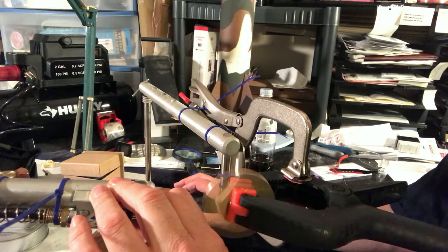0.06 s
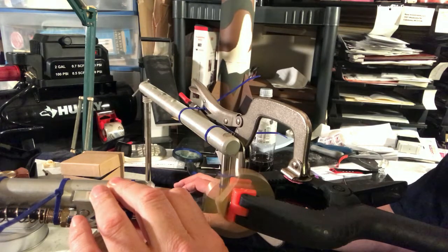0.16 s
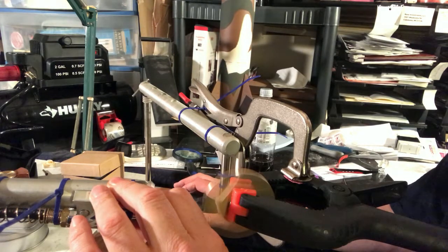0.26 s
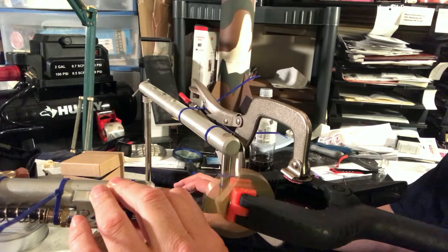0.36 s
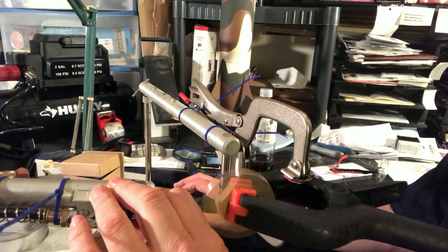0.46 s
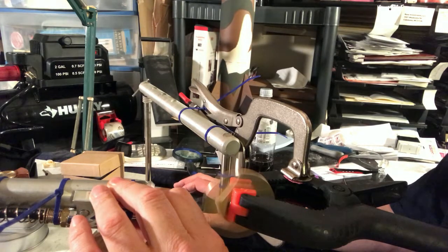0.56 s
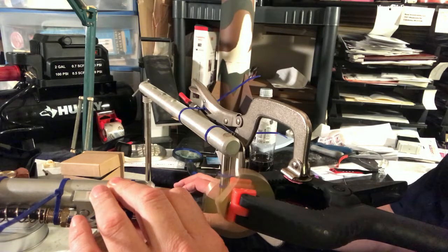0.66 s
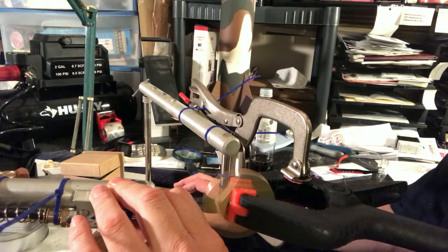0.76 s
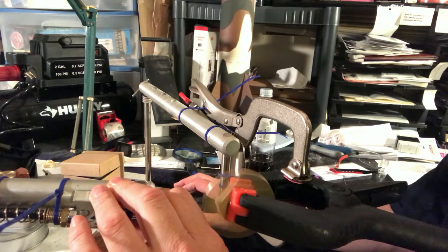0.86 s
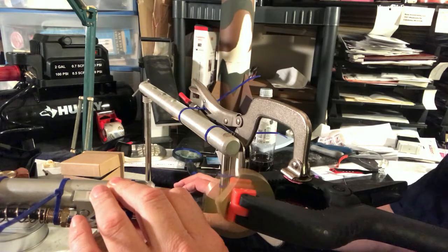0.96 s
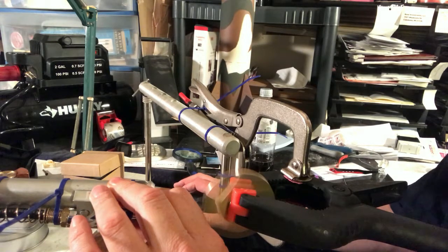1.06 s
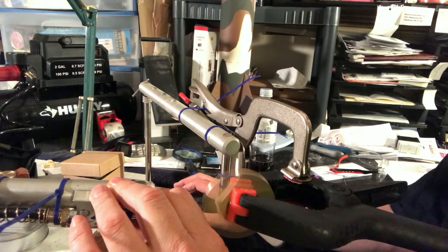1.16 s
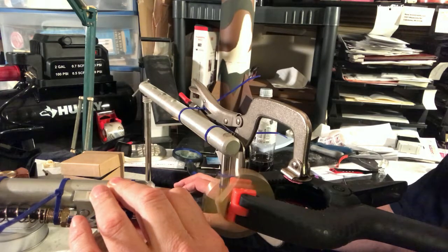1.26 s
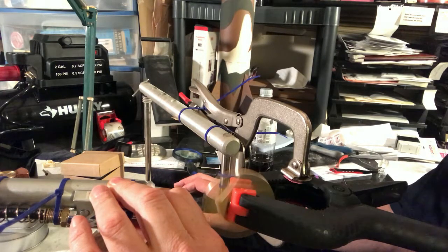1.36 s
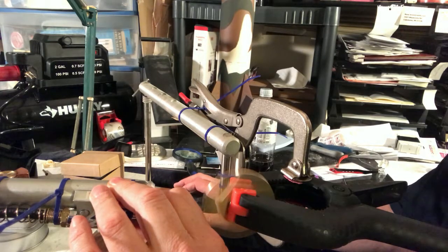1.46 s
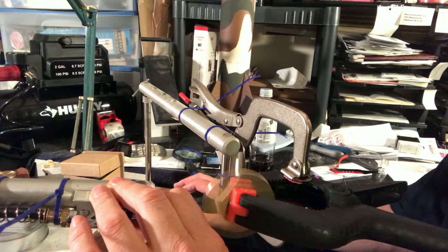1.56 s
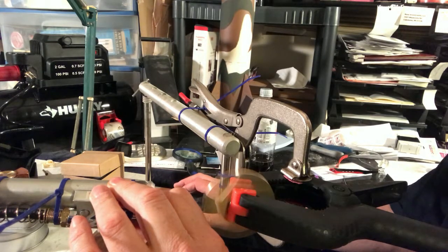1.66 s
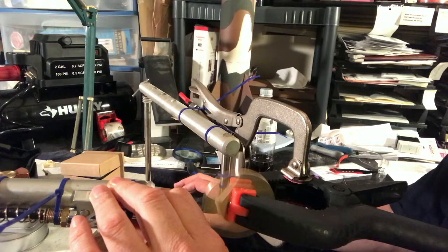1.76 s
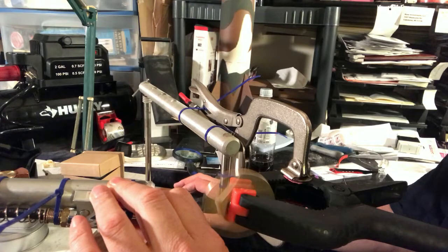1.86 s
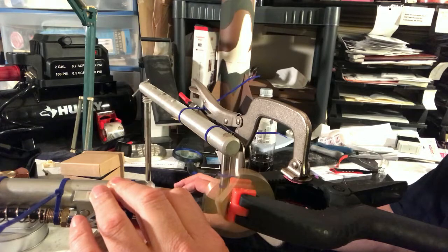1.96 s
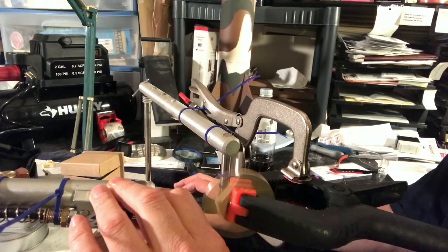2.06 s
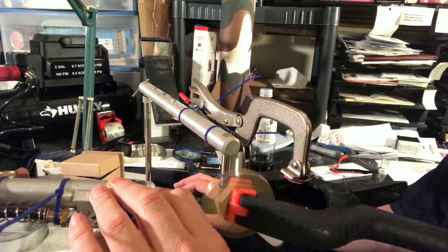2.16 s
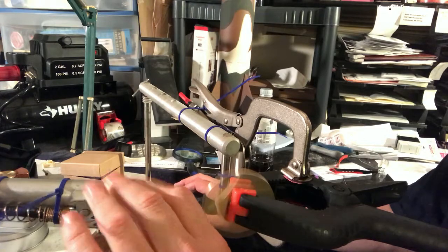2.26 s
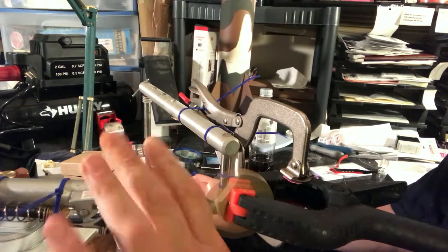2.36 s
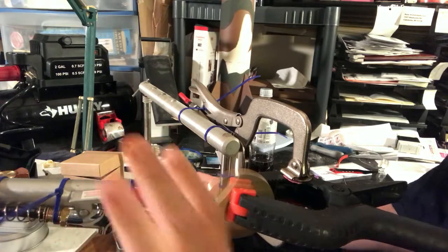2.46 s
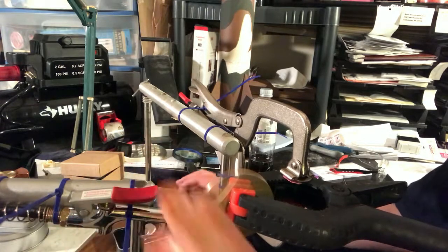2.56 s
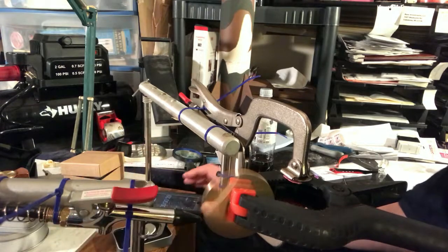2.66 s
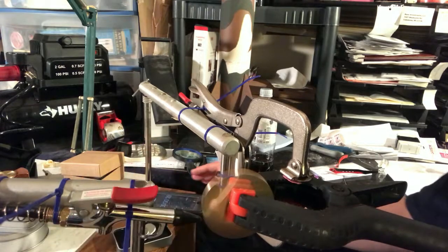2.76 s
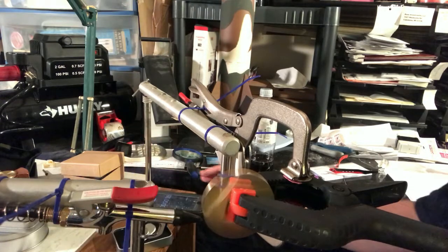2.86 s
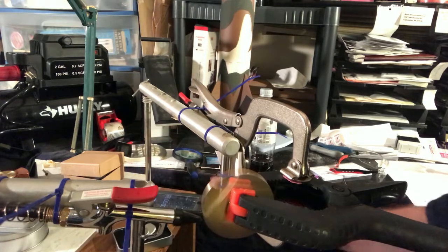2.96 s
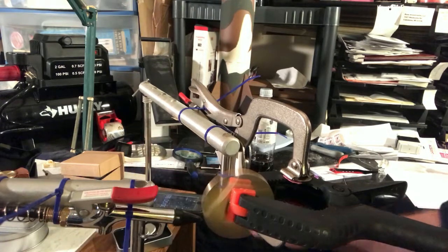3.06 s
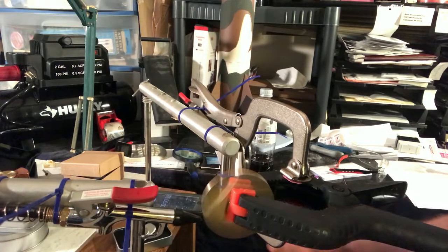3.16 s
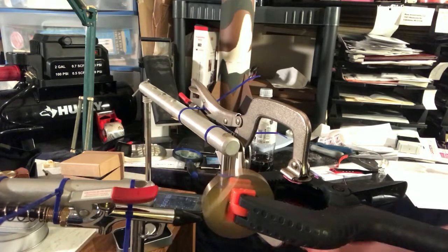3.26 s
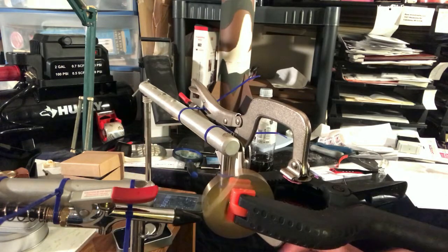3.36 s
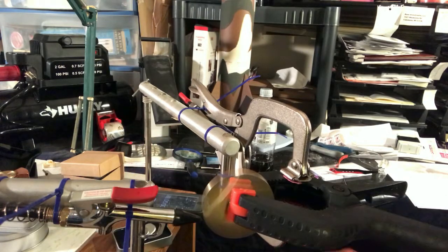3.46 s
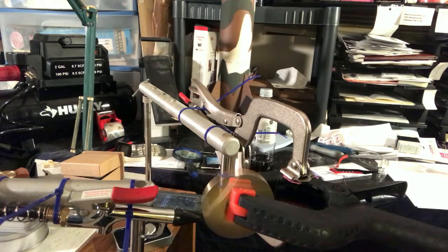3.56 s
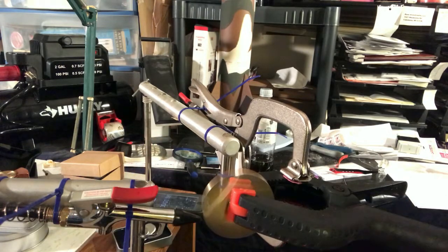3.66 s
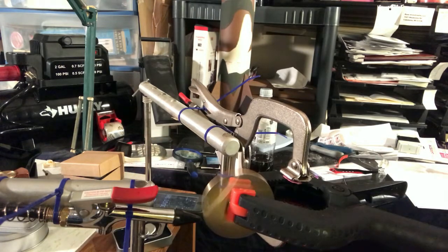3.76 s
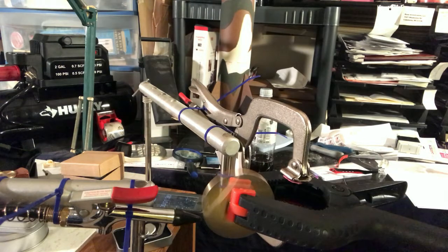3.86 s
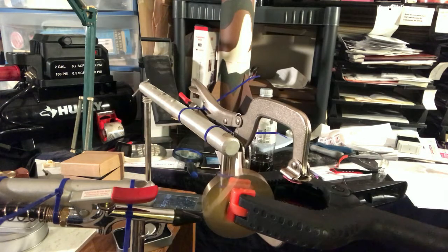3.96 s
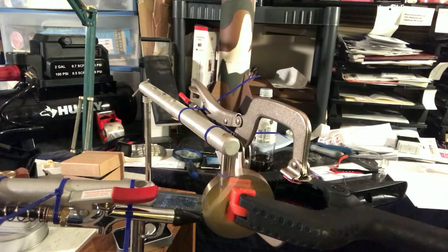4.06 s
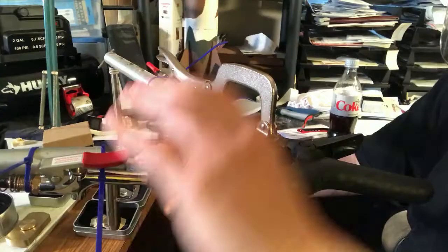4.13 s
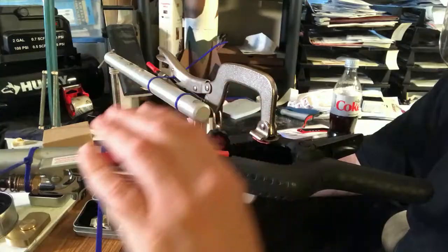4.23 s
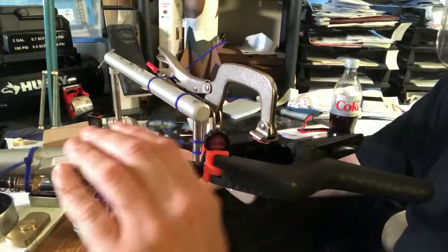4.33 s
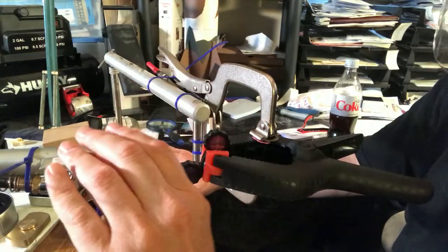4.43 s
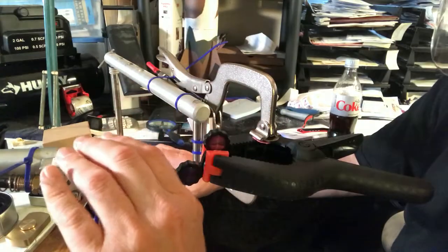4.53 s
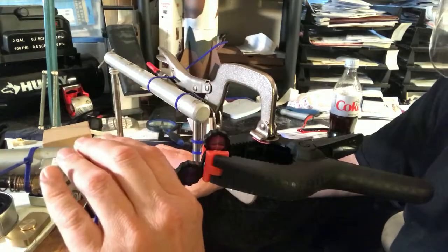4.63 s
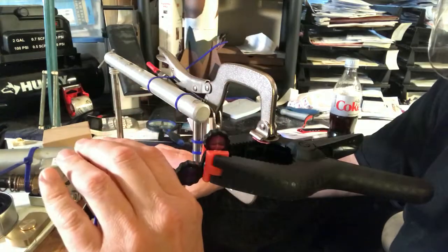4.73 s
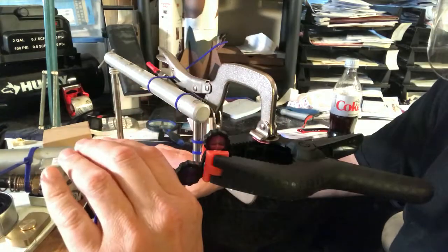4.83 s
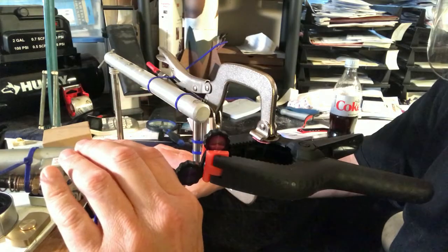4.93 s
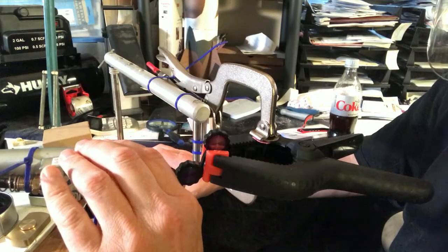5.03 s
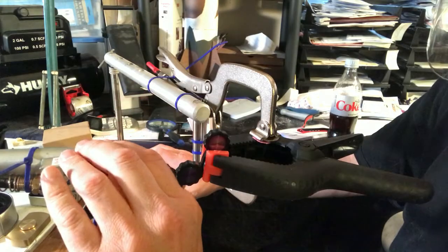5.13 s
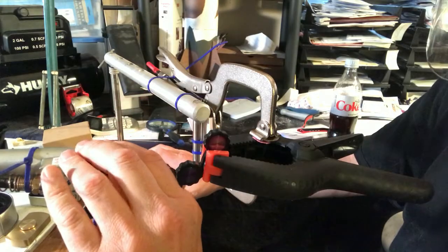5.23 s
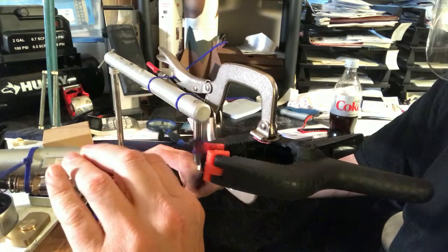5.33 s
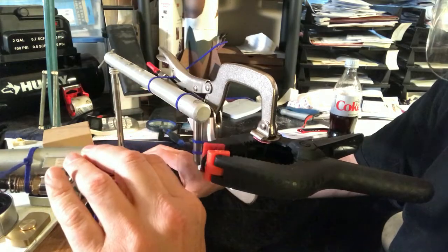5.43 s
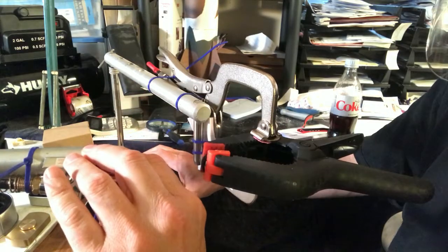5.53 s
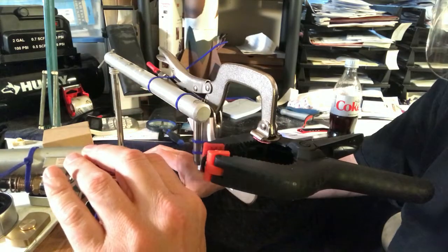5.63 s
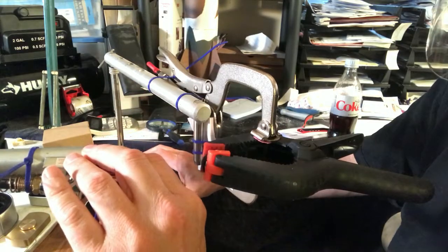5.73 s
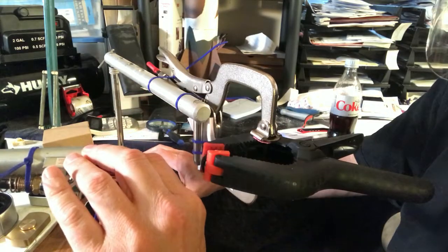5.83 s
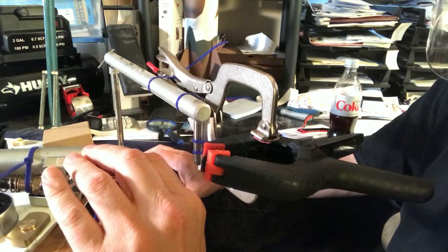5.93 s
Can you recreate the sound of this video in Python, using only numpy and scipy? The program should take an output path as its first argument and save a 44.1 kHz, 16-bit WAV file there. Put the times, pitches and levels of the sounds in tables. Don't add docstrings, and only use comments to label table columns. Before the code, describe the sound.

Close, fairly dry, nearly mono sound: steady bright air hiss with a loud rising siren, shut off suddenly. A metallic rattling whir remains, with high thin squeals and irregular hard clicks over a growing low hum. A cut to silence, then faint room hum, then a burst of air on a smaller spinner, chopped slowly at first, then quickly accelerating into a whine, with low wind thumps.

```python
import sys
import numpy as np
from scipy import signal
from scipy.fft import rfft, irfft
from scipy.io import wavfile

SR = 44100
rng = np.random.default_rng(int(sys.argv[2]) if len(sys.argv) > 2 else 0)


def field_ratio(decibels):
    return 10 ** (np.asarray(decibels, dtype=float) / 20)


def wrap_up_sound(samples):
    columns = np.atleast_2d(samples).T
    tamed = np.clip(columns, -1, 1)
    steps = np.round(tamed * 32767).astype(np.int16)
    wavfile.write(sys.argv[1], SR, steps)


N = 264140
T = np.arange(N) / SR


def rms_one(x):
    return x / np.sqrt(np.mean(x ** 2) + 1e-20)


def in_time(rows, **ends):
    t, *columns = np.transpose(rows)
    return [np.interp(T, t, c, **ends) for c in columns]


def drift(rate_hz):
    r = np.exp(-80 * np.pi * rate_hz / SR)
    white = rng.standard_normal(N // 40 + 2002)
    slow = signal.lfilter([1], [1, -2 * r, r * r], white)[2000:]
    return np.interp(np.arange(N) / 40, np.arange(len(slow)), rms_one(slow - slow.mean()))


def coloured(spectrum):
    hz, level_db = np.transpose(spectrum)
    bins_hz = np.maximum(np.arange(N // 2 + 1) * SR / N, 1)
    gain = field_ratio(np.interp(np.log(bins_hz), np.log(hz), level_db))
    return rms_one(irfft(rfft(rng.standard_normal(N)) * gain, N))


def resonances(x, modes):
    out = 0
    for k, (hz, width_hz, level_db) in enumerate(modes):
        r = np.exp(-np.pi * width_hz / SR)
        poles = [1, -2 * r * np.cos(2 * np.pi * hz / SR), r * r]
        gain = (-1) ** k * field_ratio(level_db) * (1 - r * r) / 2
        out = out + gain * signal.lfilter([1, 0, -1], poles, x)
    return out


def bell_db(hz, centre_hz, width_hz, peak_db):
    return peak_db / (1 + (2 * (hz - centre_hz) / width_hz) ** 2)


def high_pass(x, order, hz):
    return signal.sosfilt(signal.butter(order, hz, "high", fs=SR, output="sos"), x)


ROOM_T60_S, ROOM_DB = 0.16, -10.5


def room(x):
    age = np.arange(SR // 2) / SR
    tail = rng.standard_normal(SR // 2) * field_ratio(-60 * age / ROOM_T60_S) * (age > .004)
    return x + field_ratio(ROOM_DB) * signal.fftconvolve(x, tail / np.sqrt(np.sum(tail ** 2)))[:N]


# f/Hz, density/dB
SHOP_SPECTRUM = [(24, -36.5), (40, -7.5), (101, 0), (185, -3.5), (345, -5.5), (491, -16.5), (615, -13.5),
                 (1550, -17), (1760, -16), (2150, -23), (6490, -28.5), (14500, -38), (16000, -41.5)]
# f/Hz, level/dB
HUM_LINES = [(119.6, -80.5), (179.7, -72), (239.2, -75), (359.7, -80.5), (893.8, -85), (1120, -88)]
# t/s, length/s, level/dB
FAN_SWELLS = [
    (4.33, .58, -73),
    (5.08, .6, -74.5),
]
SHOP_DB, WHINE_HZ = -62.5, 1739.6


def shop():
    hum, swell = 0, 0
    for hz, db in HUM_LINES:
        hum = hum + field_ratio(db + 3.0 * drift(3.9)) * np.cos(2 * np.pi * hz * T + .5 * drift(4))
    for t, length, db in FAN_SWELLS:
        swell = swell + field_ratio(db) * np.sqrt(np.sin(np.pi * np.clip((T - t) / length, 0, 1)) + 1e-12)
    whine = swell * np.cos(2 * np.pi * WHINE_HZ * T + .3 * drift(5))
    return field_ratio(SHOP_DB - 2.0 + 0.76 * drift(12)) * coloured(SHOP_SPECTRUM) + np.sqrt(2) * (hum + whine)


# t/s, peak/dB, top f/Hz, t60/s
GUST_EVENTS = [
    (5.427, -7, 1500, 0.017),
    (5.438, -8.5, 460, 0.025),
    (5.449, -17, 250, 0.044),
    (5.663, -13.5, 487, .015),
    (5.700, -19, 200, 0.068),
    (5.710, -13, 402, 0.022),
    (5.815, -20, 250, 0.024),
]


def gusts():
    out = np.zeros(N)
    age = np.arange(3000) / SR
    for t, peak_db, top_hz, t60_s in GUST_EVENTS:
        swing = np.sin(2 * np.pi * 0.5 * top_hz * age * np.exp(-age * 90))
        swing = swing + .7 * rng.standard_normal(3000)
        low_pass = signal.butter(1, 0.74 * top_hz, fs=SR, output="sos")
        puff = signal.sosfilt(low_pass, swing * field_ratio(-60 * age / t60_s))
        out[round(t * SR):][:3000] += field_ratio(peak_db) * puff / np.abs(puff).max()
    rumble = coloured([(15, -20), (45, 1.5), (120, -9.5), (300, -17.5), (900, -51)])
    rumble = rumble * field_ratio(-37.5 + 4 * drift(25))
    return out + rumble * np.clip((T - 5.4) / .05, 0, 1)


# t/s, rate/(turns/s)
COAST_SPEED = [(2.37, 188.5), (2.7, 187.8), (3.2, 186), (3.7, 184.2), (4.16, 183.3)]
# f/Hz, width/Hz, level/dB
BODY_MODES = [(613, 35, 3), (659, 54, 0), (700, 21, -3.5), (865, 18, 3.5), (1118, 8.2, 6), (1395, 52, 0.5),
              (1602, 35, 2.5), (1993, 164, 4.5), (2170, 69, 2.5), (2660, 120, 4), (2774, 100, 2.5),
              (3288, 47, 6), (3644, 240, 4.5), (4020, 220, -17), (4160, 210, 1), (5390, 200, -7),
              (6500, 270, -18.5), (9430, 390, -27)]
# f/Hz, density/dB
WHIR_SPECTRUM = [(60, -14), (200, -4.5), (450, -9.5), (650, -11.5), (1000, -9.5), (2000, 0), (3500, -3.5),
                 (4400, -14.5), (4900, -44), (5500, -14), (7000, -25.5), (9500, -32), (11000, -49.5),
                 (16000, -51.5)]
# f/Hz, density/dB
RACE_SPECTRUM = [(8000, -30), (10500, -12), (12300, -4.5), (12900, 2.5), (13500, 2.5), (14200, -8),
                 (15300, -3), (16500, -13)]
# f/Hz, sideband/turn rates, level/dB
SQUEAL_LINES = [(7762, -1, -3), (7762, 0, 0), (7762, 1, -9), (15197, -1, -19), (15197, 0, -18),
                (15197, 1, -20), (15197, 2, -21)]
# share of cycle, level/dB
CONTACTS = [(.085, 0), (.215, -2), (.32, -6), (.5, -6), (.665, -5), (.85, -11)]
# multiple of cycle rate, level re rattle/dB
CAGE_TONES = [(3, -30), (4, -24.5), (6, -20.5), (7, -17), (8, -23.5), (12, -27)]
# t/s, rattle/dB, unbalance hum/dB
COASTING_LEVELS = [
    (2.43, -39.5, -72),
    (2.5, -42, -74),
    (2.58, -36, -68),
    (2.68, -37.5, -62),
    (2.8, -35.5, -55.5),
    (3.3, -34.5, -53),
    (3.5, -35, -48.5),
    (3.68, -34, -45.5),
    (4.15, -34, -42.5),
]
# t/s, length/s, level/dB
SQUEAK_EVENTS = [(2.51, .1, -65), (2.68, .07, -60), (2.8, .03, -58), (2.84, 0.17, -52), (3.02, .05, -58),
                 (3.144, 0.12, -52), (3.28, .135, -52), (3.46, .03, -52), (3.51, 0.13, -51),
                 (3.678, .03, -56), (3.75, .04, -58), (3.83, 0.075, -51), (3.961, 0.064, -48),
                 (4.045, 0.12, -53)]
# t/s, peak/dB
TICK_EVENTS = [(2.5257, -26), (2.781, -16.5), (2.8666, -23), (2.8974, -26.5), (3.0799, -26), (3.125, -24),
               (3.145, -27), (3.2096, -21.5), (3.5773, -20.5), (3.5987, -16), (3.8698, -25), (3.903, -24.5),
               (3.9804, -22.5), (4.0891, -30)]
SQUEAK_EDGE_S, SQUEAK_REST_DB, TICK_OVER_DB = .006, -64, 22.5
# start/s, end/s
GAP_S = (4.1495, 4.196)


def cage_contacts(turns, end):
    share, contact_db = np.transpose(CONTACTS)
    cycles = np.arange(int(turns[-1] / 2) - 1)[:, None]
    late = .015 * rng.standard_normal((len(cycles), len(share)))
    at = np.searchsorted(turns / 2, (cycles + share + late).ravel())
    strength_db = (contact_db + np.clip(2.6 * rng.standard_normal(late.shape), -10, 4)).ravel()
    tick_s, tick_db = np.transpose(TICK_EVENTS)
    strength_db = np.r_[strength_db[at < end], tick_db + TICK_OVER_DB]
    return np.r_[at[at < end], (tick_s * SR).astype(int)], strength_db


def body_rattle(at, strength_db, start, end):
    signs, rattle = rng.choice([-1, 1], len(at)), np.zeros(N)
    for hz, width_hz, level_db in BODY_MODES:
        knocks = np.full(end, 1e-18)
        knocks[at] = signs * field_ratio(strength_db + 3.2 * rng.standard_normal(len(at)))
        soft = resonances(knocks[start:], [(hz, 3.2 * width_hz, 0)])
        rattle[start:end] += resonances(soft, [(hz, width_hz, level_db)])
    return rattle


def race_squeal(turns):
    sticking = field_ratio(SQUEAK_REST_DB)
    for t, length, db in SQUEAK_EVENTS:
        edges = np.minimum(T - t, t + length - T) / SQUEAK_EDGE_S
        sticking = sticking + field_ratio(db) * np.clip(edges, 0, 1)
    slip, squeal = 0.54 * drift(15), 0
    for hz, side, db in SQUEAL_LINES:
        squeal = squeal + field_ratio(db) * np.cos(2 * np.pi * (hz * T + side * turns) + slip * hz / 7700)
    return sticking * field_ratio(-4.0 + 1.5 * drift(40)) * squeal


def coasting():
    speed, = in_time(COAST_SPEED)
    turns = np.cumsum(speed) / SR
    rattle_db, hum_db = in_time(COASTING_LEVELS)
    rattle_db = rattle_db + 0.77 * drift(10.5)
    hum_db = hum_db + 1.6 * drift(9.3)
    start, end = round(COAST_SPEED[0][0] * SR), round(GAP_S[0] * SR)
    at, strength_db = cage_contacts(turns, end)
    rattle = body_rattle(at, strength_db, start, end)
    rub = signal.lfilter([1], [1, -1.86, .8649], np.bincount(at, field_ratio(strength_db), N))
    rub = rms_one(rub[:end]).take(np.arange(N), mode="clip")
    whir = coloured(WHIR_SPECTRUM) * (field_ratio(-14.5) + field_ratio(-3.0) * rub)
    whir = whir + field_ratio(-26.5 + 2.0 * drift(18)) * coloured(RACE_SPECTRUM)
    cage = 0
    for k, db in CAGE_TONES:
        cage = cage + field_ratio(db + 2.65 * drift(14.0)) * np.cos(np.pi * k * turns + 1.0 * drift(6.6))
    hum = np.sqrt(2) * np.cos(2 * np.pi * turns)
    sound = field_ratio(rattle_db - 1.5) * (field_ratio(-5.0) * rms_one(rattle) + whir + 1.9 * cage)
    sound = sound + race_squeal(turns) + field_ratio(hum_db - 1.0) * hum
    return sound * (T > COAST_SPEED[0][0]) * (T < GAP_S[0])


# t/s, rate/(turns/s)
RESTART_SPEED = [(5.36, 5.1), (5.45, 18.5), (5.55, 35.7), (5.65, 54.5), (5.75, 74.0), (5.85, 93.7),
                 (5.92, 107.0), (5.99, 119.7)]
# f/Hz, density/dB
JET_TWO_SPECTRUM = [(59, -37), (100, -14), (289, -9.5), (801, -8.5), (1060, -5.5), (1650, -5.5),
                    (3540, -5.5), (4290, -4), (4870, -9.5), (5420, 0), (7140, -8), (14700, -4.5),
                    (16000, -11.5)]
# f/Hz, width/Hz, level/dB
NOZZLE_WHISTLES = [(4296, 320, 0.5), (5100, 330, -3), (6100, 500, -7.5)]
# angle/turn, level/dB
ARM_SHADOW = [(0, -0.5), (.15, 2.6), (.4, 4), (.65, 5), (.78, 3.5), (.93, -5.5), (1, -6.5)]
# multiple of turn rate, level/dB
SMALL_SIREN_TONES = [(1, 4), (2, -6.5), (3, -19), (5, -10), (7, -5), (8, -3.5), (9, -10), (10, -4.5),
                     (11, 0), (12, -2), (13, -6), (14, -5.5), (15, -5.5), (16, -10), (20, -10.5), (24, -12),
                     (25, -9.5), (26, -13)]
# t/s, level/dB
SMALL_SIREN_LEVEL = [(5.5, -68), (5.65, -36.5), (5.78, -36), (5.99, -33)]
RESTART_TURN = .434
OPEN_S, OPEN_DB_PER_S = 5.376, 2400
SURGE_S, SURGE_DB, SURGE_RISE_S, SURGE_FADE_S = 5.25, 7, 0.066, 0.15
FLOW_DB, FLOW_SAG_DB_PER_S = -17.5, 3.5
EDGE_HZ, EDGE_DB = 7400, -8.5
SHELL_HZ, SHELL_WIDTH_HZ, SHELL_DB = 1200, 700, 6


def second_blast():
    speed, = in_time(RESTART_SPEED, left=0)
    turns = RESTART_TURN + np.cumsum(speed) / SR
    surge = np.minimum((T - SURGE_S) / SURGE_RISE_S, (SURGE_S - T) / SURGE_FADE_S)
    surge_db = SURGE_DB * np.exp(surge) - FLOW_SAG_DB_PER_S * (T - SURGE_S)
    hiss_db = FLOW_DB + surge_db - OPEN_DB_PER_S * np.clip(OPEN_S - T, 0, .08)
    shade_db = np.interp(turns % 1, *np.transpose(ARM_SHADOW))
    shade = field_ratio(np.clip((T - 5.42) / 0.013, 0, 1) * shade_db)
    whistle = rms_one(resonances(rng.standard_normal(N), NOZZLE_WHISTLES))
    whistle = whistle * shade * field_ratio(-12.0 + 2.4 * drift(40)) * np.clip((T - 5.4) / 0.025, 0, 1)
    edge = rms_one(high_pass(rng.standard_normal(N), 4, EDGE_HZ))
    edge = field_ratio(EDGE_DB + 1.3 * surge_db + 2.9 * drift(120)) * shade * edge
    jet = coloured(JET_TWO_SPECTRUM) + whistle + edge
    siren = 0
    for k, db in SMALL_SIREN_TONES:
        level_db = db + bell_db(k * speed, SHELL_HZ, SHELL_WIDTH_HZ, SHELL_DB) + 1.9 * drift(15)
        phase = 2 * np.pi * k * turns + .025 * k * k + 0.013 * k * drift(8)
        siren = siren + field_ratio(level_db) * np.cos(phase)
    siren_db, = in_time(SMALL_SIREN_LEVEL, left=-140)
    return room(field_ratio(hiss_db - 1.35) * shade * jet) + field_ratio(siren_db - .6) * siren


# f/Hz, level/dB
PUFF_COLOUR = [(160, 4), (340, 0.5), (540, -5), (900, 0), (1450, -0.5), (2100, -3.5), (3000, -11),
               (5600, -16.5)]
# f/Hz, width/Hz, level/dB
HOUSING_MODES = [(610, 70, 6), (700, 100, -9), (1270, 80, 3), (1600, 150, 2), (1770, 70, -5),
                 (1890, 100, 4), (2200, 120, -3), (2610, 130, 5), (3190, 150, 10), (3550, 150, 3),
                 (3950, 200, -4), (4280, 250, 8), (4900, 250, -5), (5260, 200, 7)]
LOBE_SHARE = 0.64
LOBE_BLUR = 45


def lobe_siren(speed, angle):
    on = T < 2.5
    wander, siren = drift(6), np.zeros(N)
    puff_hz, puff_db = np.transpose(PUFF_COLOUR)
    for k in range(1, 31):
        spacing = np.pi * (2 * k + 1) / 3
        pair = np.angle(1 + .95 * np.exp(-1j * spacing)) + .018 * k * k + .1
        lobes = abs(1 + LOBE_SHARE * np.exp(-k / LOBE_BLUR - 1j * spacing))
        hz = k * speed[on][::64]
        colour_db = np.interp(np.log(hz), np.log(puff_hz), puff_db)
        colour_db = colour_db + sum(bell_db(hz, *mode) for mode in HOUSING_MODES)
        level_db = np.interp(T[on], T[on][::64], colour_db) + (.8 + 0.055 * k) * drift(4.4)[on]
        siren[on] += lobes * field_ratio(level_db) * np.cos(k * (angle + 0.018 * wander)[on] + pair)
    return siren / np.std(siren[on])


# f/Hz, density/dB
JET_SPECTRUM = [(60, -25.5), (150, -8), (500, -6.5), (1200, -3.5), (2500, -5), (3800, -4.5), (4350, -3.5),
                (5000, -6), (6300, -2.5), (9000, -4), (10500, -7), (12000, -4), (14500, -1.5), (16500, -8)]
# f/Hz, width/Hz, level/dB
CAVITIES = [(2600, 96, -5), (3240, 160, -4), (4314, 69, 0), (5630, 250, 0.5)]
START_TURNS_PER_S, TOP_TURNS_PER_S, SPIN_UP_S = 151.745, 256.1, 5.4352
SHUT_S = 2.369
SIREN_DB, SIREN_GAIN_DB_PER_S = -20.5, 1.02
HISS_DB, HISS_SAG_DB_PER_S = -22, 0.56


def first_blast():
    speed = TOP_TURNS_PER_S - (TOP_TURNS_PER_S - START_TURNS_PER_S) * np.exp(-T / SPIN_UP_S)
    angle = 2 * np.pi * np.cumsum(speed) / SR
    siren_db = SIREN_DB + SIREN_GAIN_DB_PER_S * T
    hiss_db = HISS_DB - HISS_SAG_DB_PER_S * T
    valve = field_ratio(-np.clip(T - SHUT_S, 0, 1) * 1600)
    siren = valve * field_ratio(siren_db - .5) * lobe_siren(speed, angle)
    throb_db = 0.77 * np.cos(angle + 0.89) + 0.93 * np.cos(2 * angle + 0.74)
    throb = field_ratio(throb_db + 1.1 * np.cos(3 * angle + 0.92) + .5 * drift(3.7))
    buffet = coloured([(20, -9.5), (60, 1), (110, -5.0), (200, -30)])
    buffet = field_ratio(-50.5 - 7.2 * T + 2.8 * drift(12)) * buffet
    hollow = rms_one(resonances(rng.standard_normal(N), CAVITIES))
    jet = coloured(JET_SPECTRUM) + field_ratio(-17.0 + 2.6 * drift(8.2)) * hollow
    hiss = valve * field_ratio(hiss_db + 2.0) * throb * jet
    return valve * buffet + 0.62 * siren + room(0.39 * siren + hiss)


def scene():
    first = first_blast() + coasting() + shop()
    second = (second_blast() + gusts() + shop()) * (T > GAP_S[1])
    mono = first * np.clip((GAP_S[0] - T) / .002, 0, 1) + second
    return np.array([mono, mono])


def roll_off(x):
    return signal.sosfilt(signal.butter(12, 16990, fs=SR, output="sos"), x)


# t/s, low f/Hz, high f/Hz, level/dB
SIDE_BURSTS = [
    (.405, 4500, 5900, -37),
    (.405, 10200, 11900, -37),
    (.82, 13800, 15800, -30),
    (1.122, 10900, 12600, -35),
    (1.957, 10200, 12600, -35),
    (2.215, 4100, 5300, -35),
    (2.215, 14400, 15800, -35),
]


def record(dry):
    white, side = rng.standard_normal(N), 0
    for t, low_hz, high_hz, db in SIDE_BURSTS:
        band = signal.butter(6, [low_hz, high_hz], "band", fs=SR, output="sos")
        fade = np.cos(np.clip((T - t) / .023, -1, 1) * np.pi / 2) ** 2
        side = side + field_ratio(db) * fade * rms_one(signal.sosfilt(band, white))
    heard = high_pass(dry, 2, 45)
    heard = .8 * np.tanh(heard / .8) + side * [[1], [-1]]
    heard = signal.sosfilt(signal.ellip(10, .5, 52, 15770, fs=SR, output="sos"), heard)
    return roll_off(heard)


dry = scene()
out = record(dry)
wrap_up_sound(out)
```